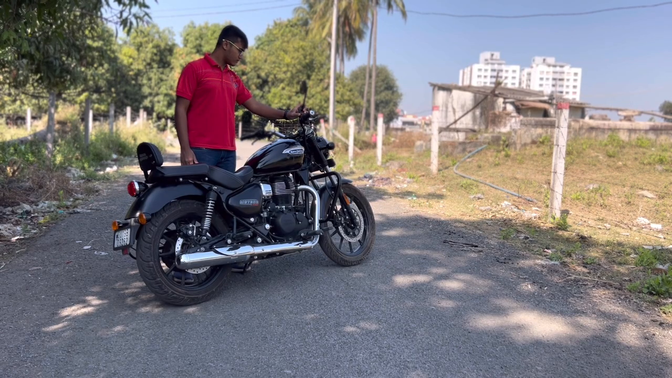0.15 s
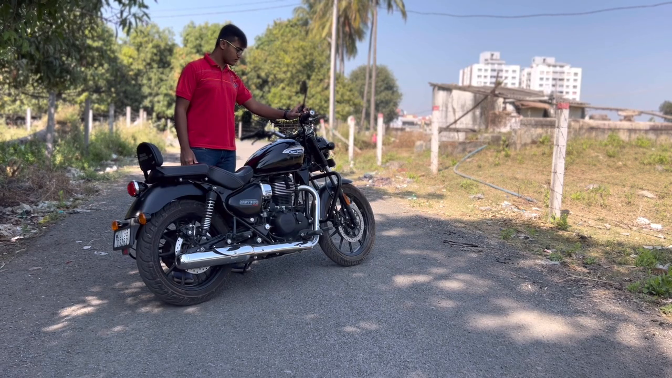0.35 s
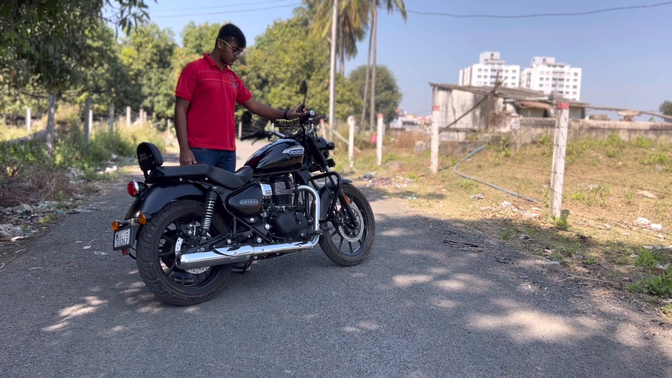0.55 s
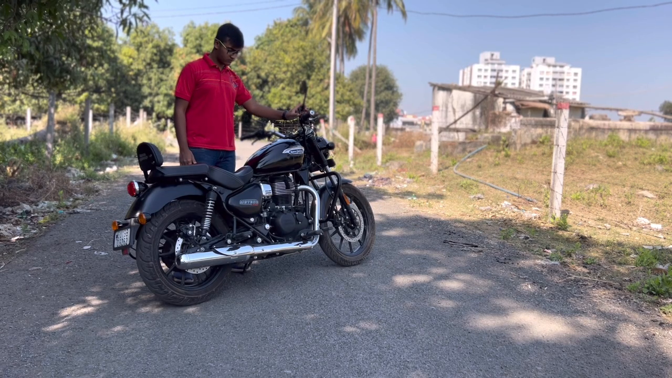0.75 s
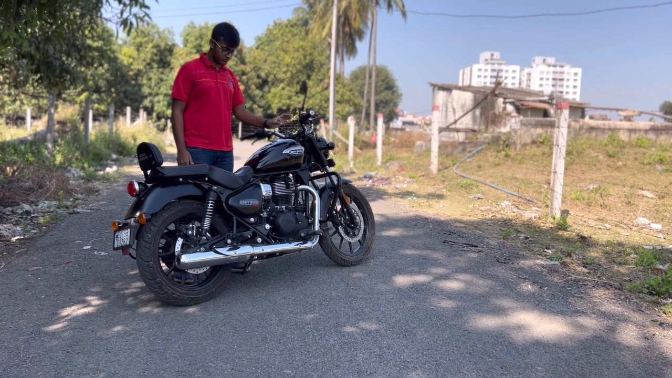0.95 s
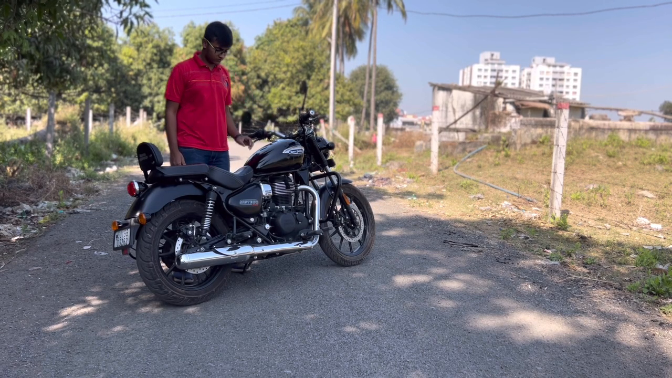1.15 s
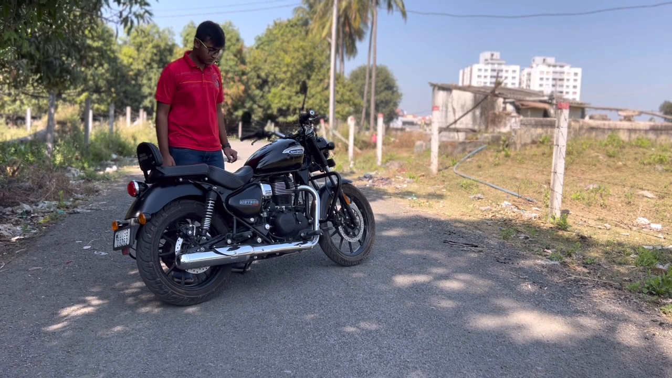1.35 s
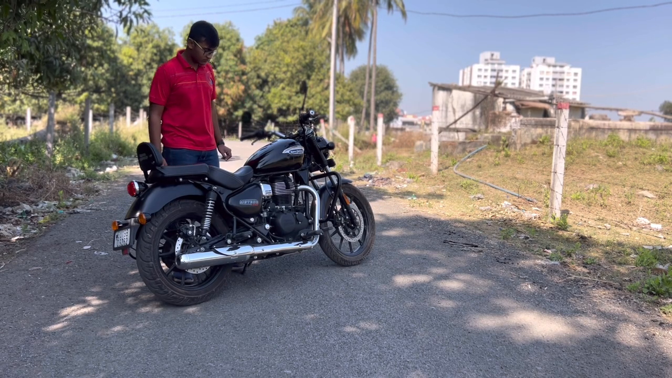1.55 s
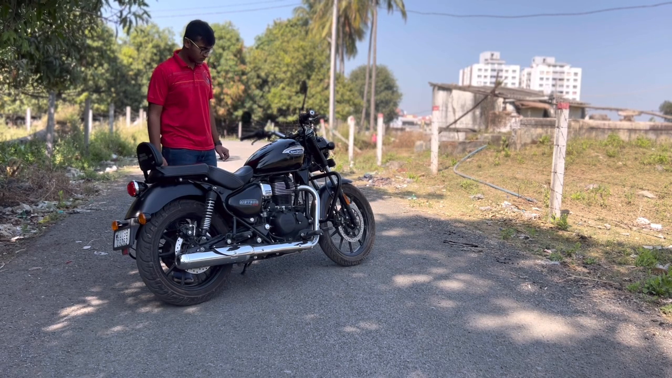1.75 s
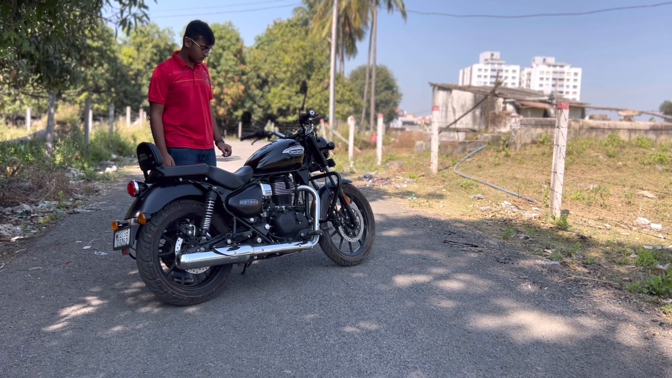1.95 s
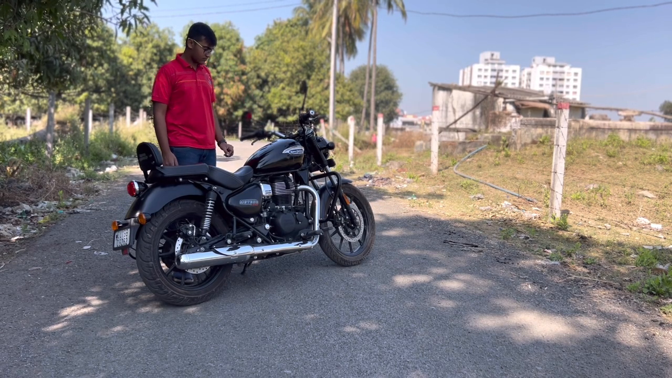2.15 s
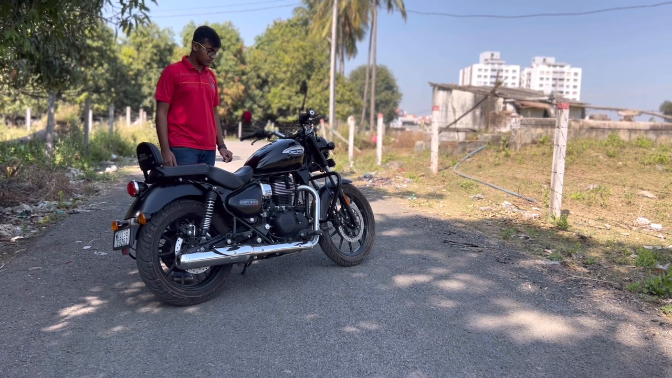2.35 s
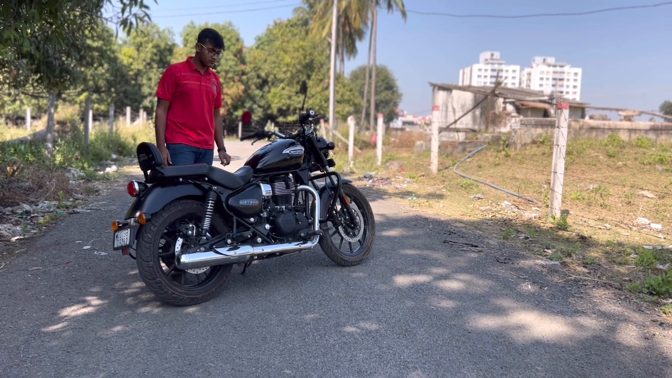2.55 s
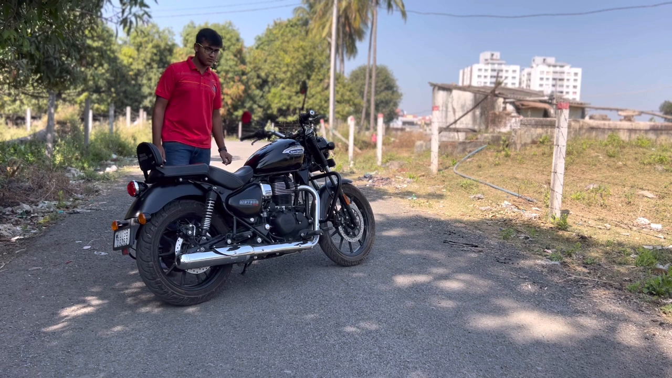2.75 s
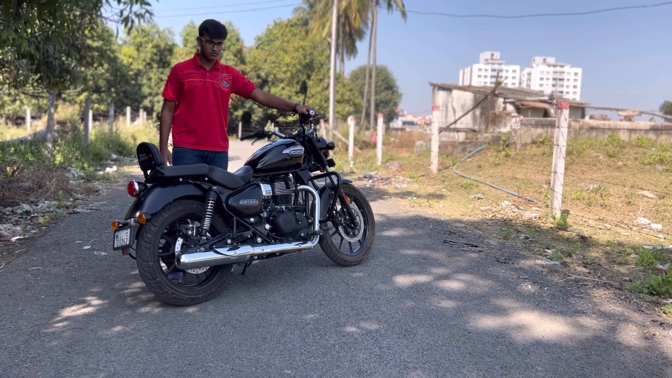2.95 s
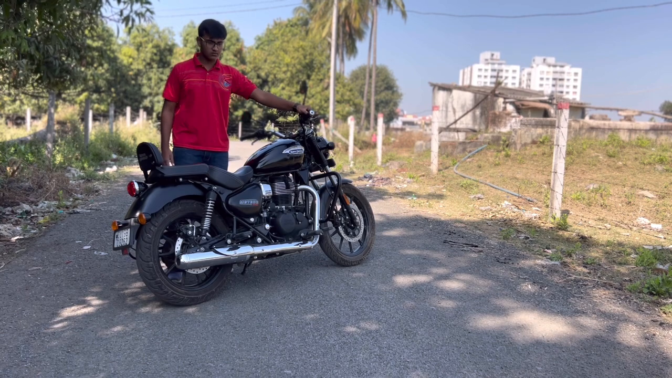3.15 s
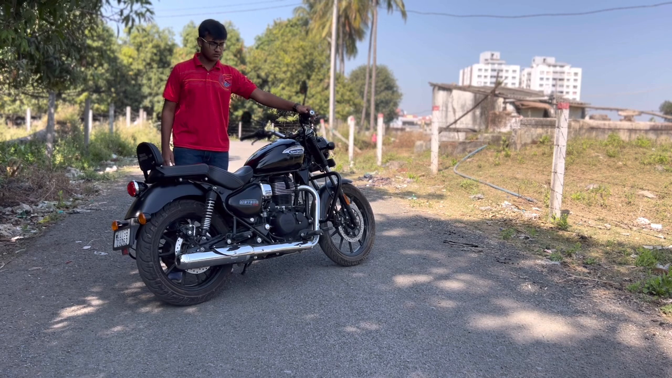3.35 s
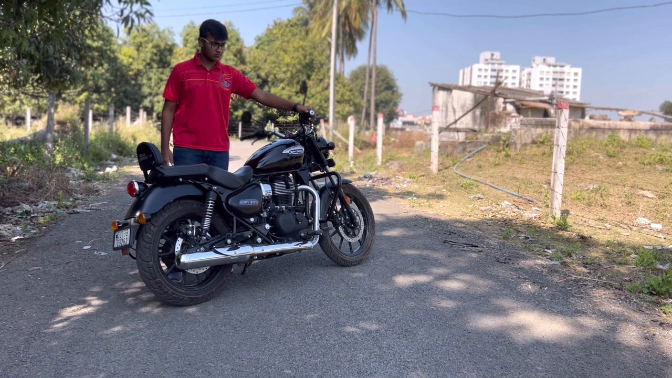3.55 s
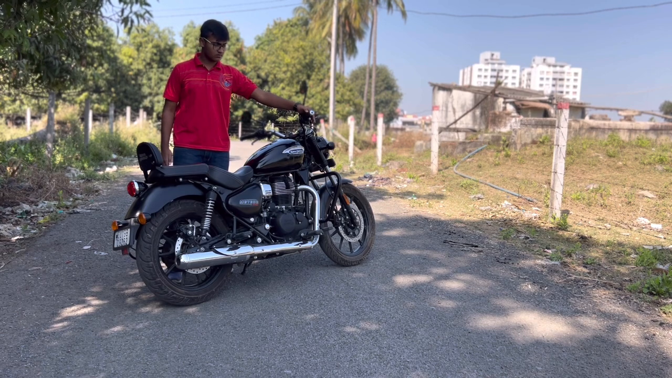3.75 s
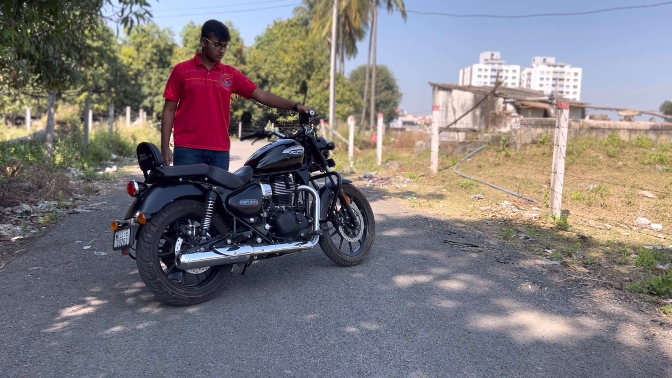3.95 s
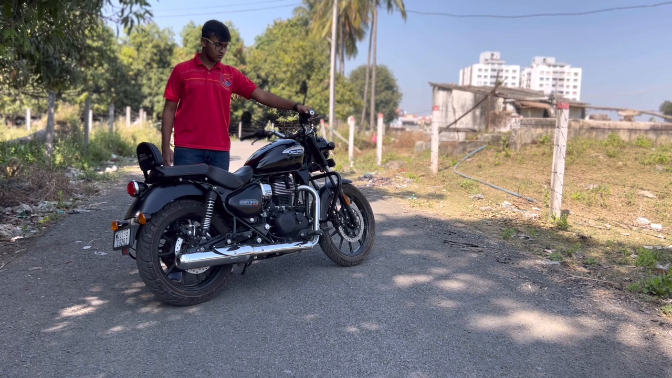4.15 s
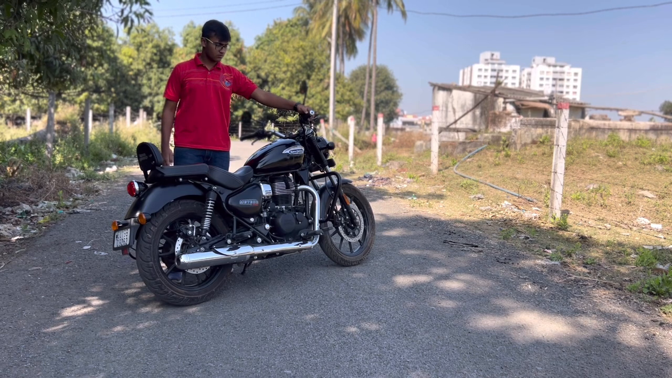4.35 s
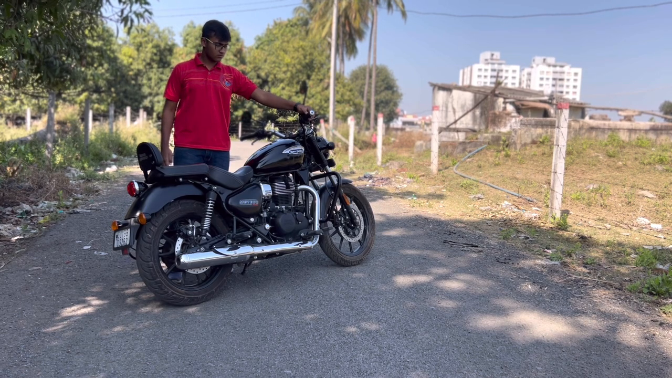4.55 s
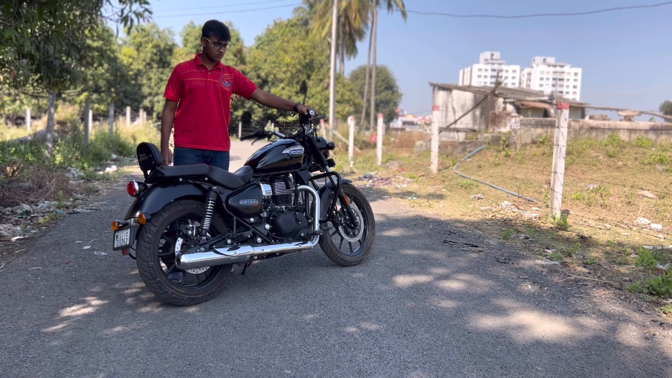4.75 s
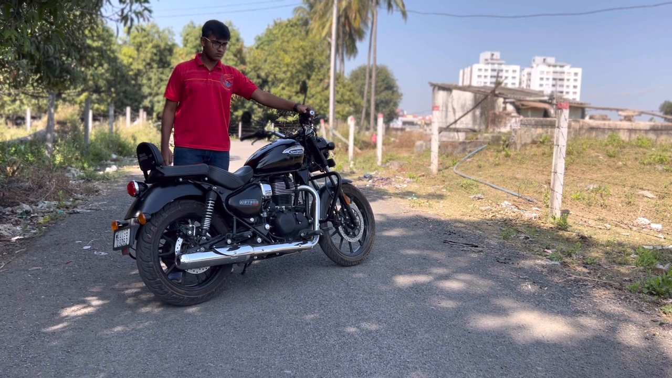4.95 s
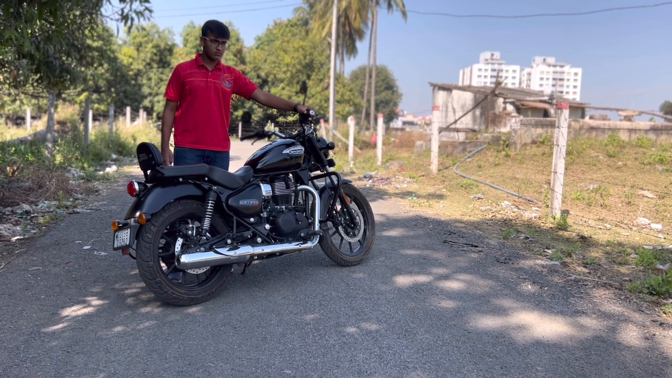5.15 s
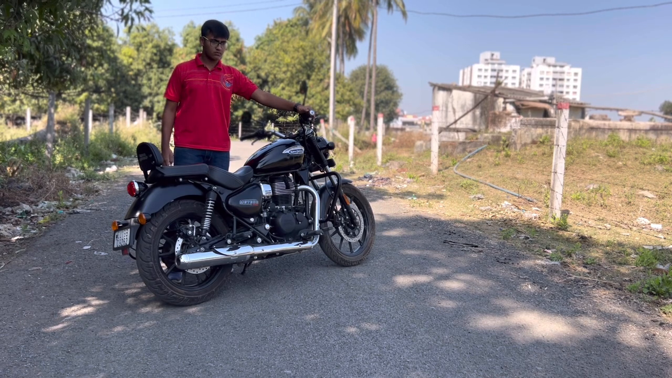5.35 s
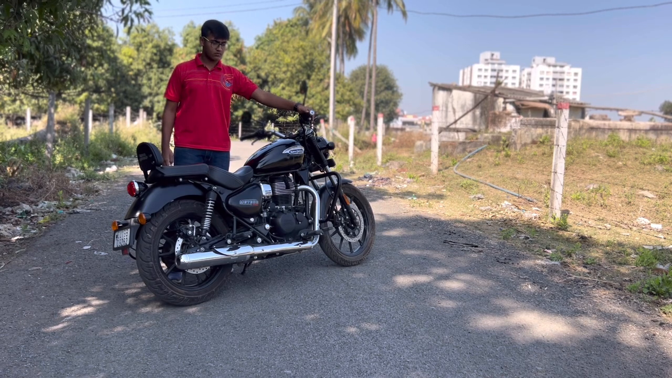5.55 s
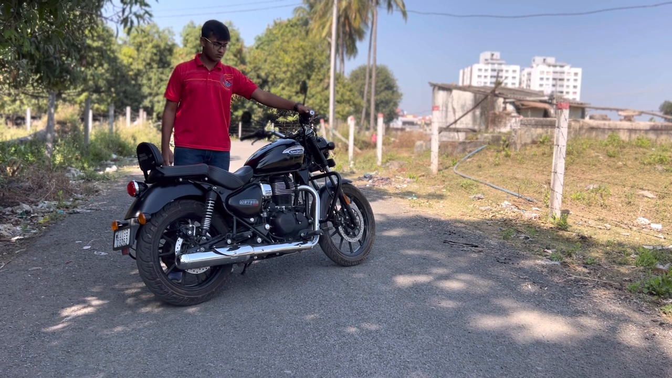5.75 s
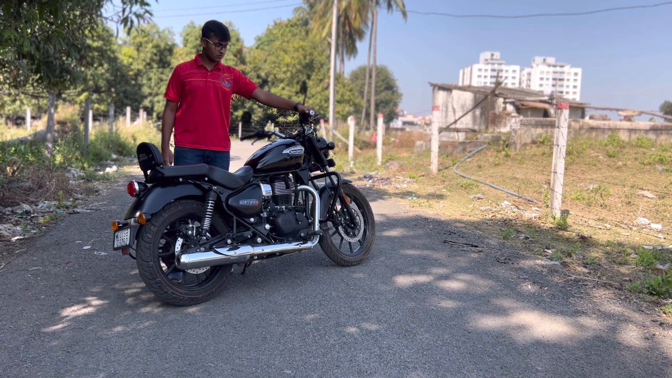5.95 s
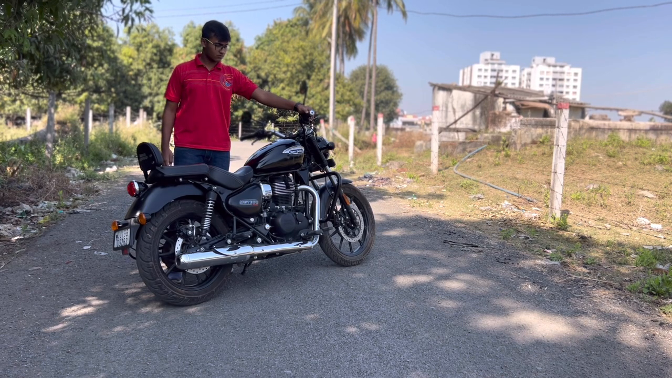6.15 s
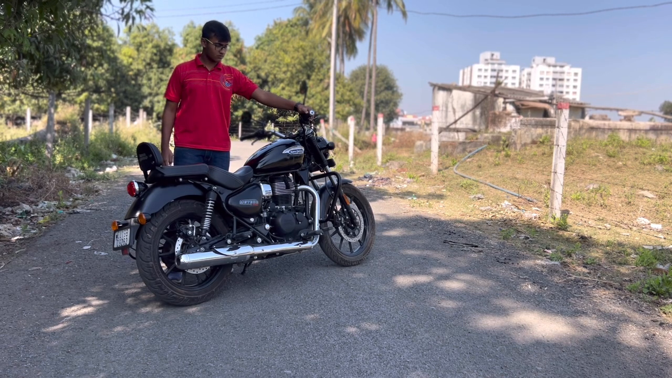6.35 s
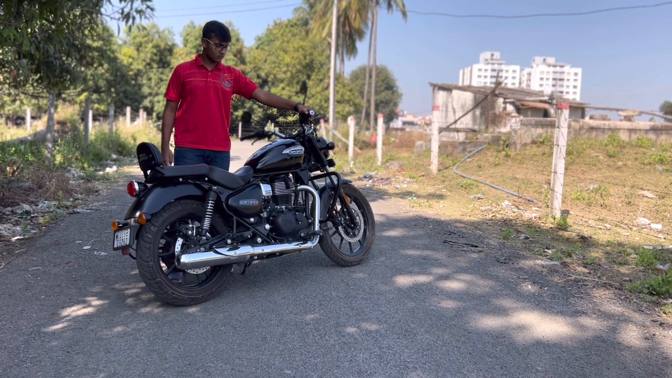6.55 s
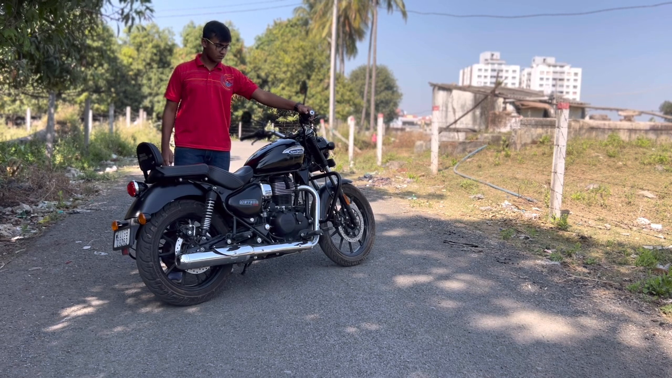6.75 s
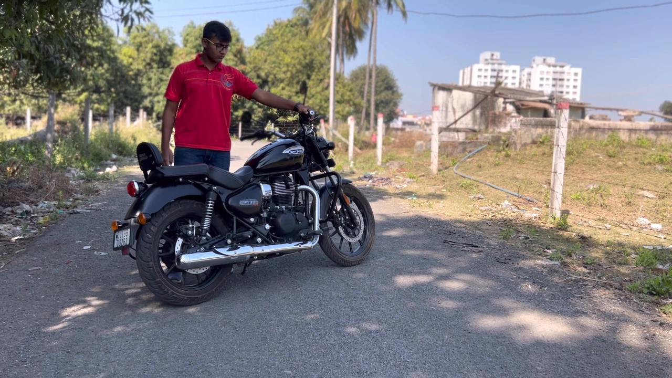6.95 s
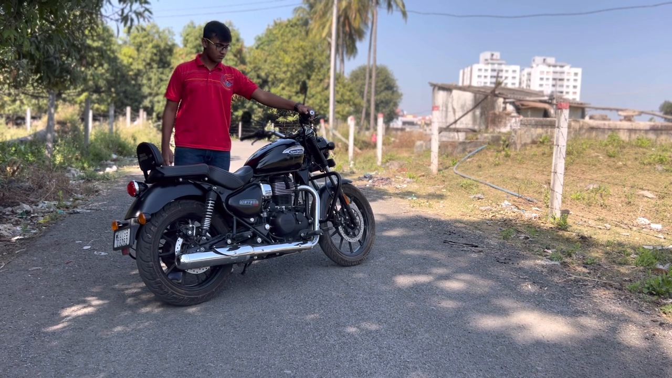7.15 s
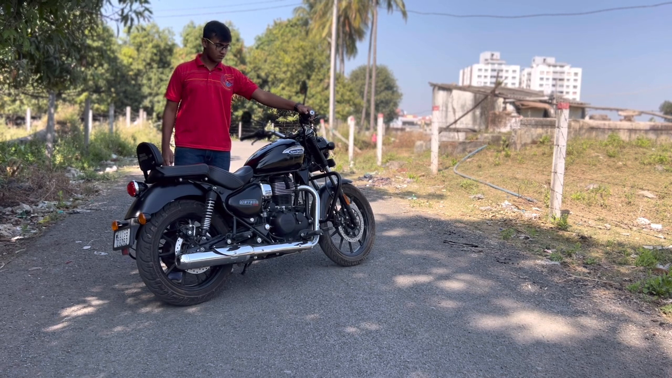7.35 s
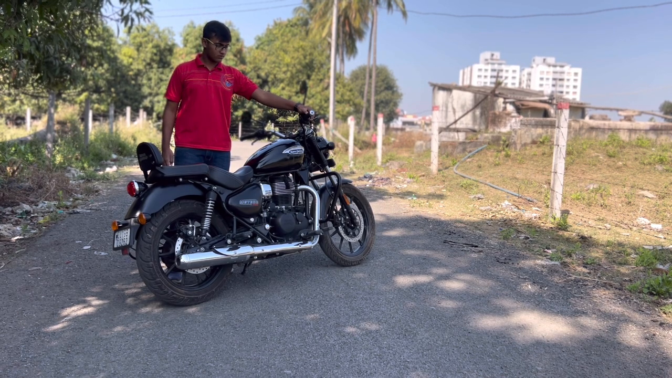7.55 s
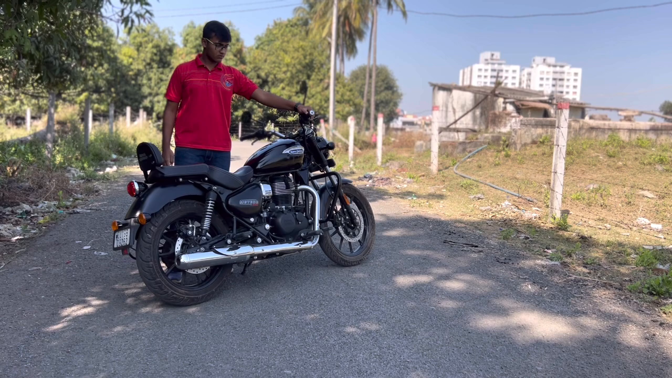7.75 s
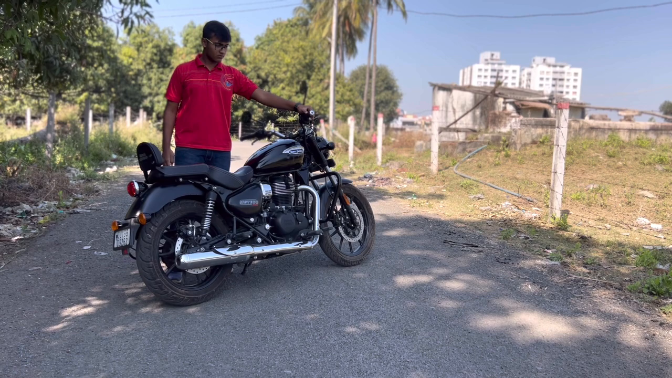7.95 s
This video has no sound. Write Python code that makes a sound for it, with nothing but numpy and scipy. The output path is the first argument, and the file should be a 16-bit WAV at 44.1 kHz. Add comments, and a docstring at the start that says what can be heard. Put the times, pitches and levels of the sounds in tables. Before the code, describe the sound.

Outdoors at a roadside, heard from a few steps away in close stereo, a parked motorcycle starts with short, sagging starter whines. The single cylinder catches and settles into separate, deep soft thumps with valve ticking and light clatter. Just before three seconds the sound dips briefly, then the throttle is blipped with a harder bark. It slows, is blipped higher, drops to idle, and revs up loud and fast to the end.

```python
"""The exhaust of a single-cylinder motorcycle booms and barks as the engine starts, idles, is blipped twice and revs up.
Engine speed times the firings; speed and effort set their strength. Each sends a gas pulse through resonant
silencer chambers and rings the pipe's modes. Shaped noise gives the gas rasp, valve tick, knocks and clatter;
decaying sines give the airbox throb and header pings.
The starter whines in gear harmonics at the first compressions, then its whirr fades away."""
import sys
import numpy as np
from scipy import signal
from scipy.fft import rfft, irfft
from scipy.io import wavfile
from scipy.ndimage import uniform_filter1d

SR = 44100
rng = np.random.default_rng(int(sys.argv[2]) if len(sys.argv) > 2 else 0)


def inscribe(sig):
    """Save sig as 16-bit PCM at rate SR to the path in sys.argv[1].

    A 1-D sig is mono; a 2-D sig holds one channel per row.
    Samples are clipped to [-1, 1] before scaling.
    """
    pcm = np.round(np.clip(np.atleast_2d(sig).T, -1, 1) * 32767)
    wavfile.write(sys.argv[1], SR, pcm.astype(np.int16))


N = 356901

# Engine speed in two stretches, each opening on a firing. Each row: time in seconds, speed in rpm.
WARM_UP_RPM = [(0.385, 994), (0.65, 1244), (1.41, 1224), (1.99, 1094), (2.22, 1011), (2.94, 1005)]
REVVING_RPM = [(3.105, 1394), (3.18, 1722), (3.39, 1933), (3.52, 1601), (3.83, 1364), (4.62, 934),
               (4.77, 1286), (4.93, 2223), (5.11, 2460), (5.22, 2003), (5.36, 2100), (5.65, 1454),
               (5.95, 1238), (6.55, 858), (7.12, 2040), (7.66, 2500), (8.06, 2837)]
# How full the cylinder's charge is. Each row: time in seconds, effort from 0 to 1.
CHARGE_EFFORT = [(.385, 0.08), (.7, 0), (1.0, 0), (1.7, 0), (2.8, 0), (3.1, 0.14), (3.18, 1), (3.26, 0.93),
                 (3.34, 0.48), (3.8, 0.46), (4.56, 0.45), (4.8, 0.98), (4.97, 1), (5.08, 0.81),
                 (5.35, 0.68), (5.6, 0.39), (6.54, 0.5), (6.67, 0.78), (7.2, 0.73), (8.06, 0.66)]
# The throttle is held open. Each row: start in seconds, end in seconds.
OPEN_THROTTLE = [(3.15, 3.28), (4.75, 5.0), (6.82, 8.1)]
# The charge burns weakly as the throttle shuts. Each row: time in seconds, weakness from 0 to 1.
WEAK_BURNS_AT = [(3.315, 0.86), (5.026, 0.96), (5.172, 0.55), (5.405, .5), (5.698, 0.47)]
# Base levels on an empty charge. Each row: speed in rpm, then boom, bark, gas rasp, valve tick, clatter in dB.
LEVELS_BY_SPEED = [(1000, -19.5, -36.5, -58.5, -53, -49), (1244, -18.5, -30.5, -59.5, -53.5, -46.5),
                   (1900, -16.5, -27, -55, -50.5, -42.5), (2570, -16, -24.5, -63.5, -47, -39)]
# What each condition adds at its full extent: boom, bark, gas rasp, valve tick, clatter in dB.
EFFORT_GAIN_DB = (5.84, 5.94, 35.24, 1.8, 5.45)
WARM_UP_GAIN_DB = (1.17, 0.67, .5, 2.33, 2.68)
WEAK_BURN_GAIN_DB = (-4.5, -8, -8, 1, -2)
# Random spread from firing to firing: boom, bark, gas rasp, valve tick in dB.
FIRING_SCATTER_DB = (1.24, 1.7, 3.4, 2)
# During the warm-up the boom thins as the idle runs fast.
IDLE_RPM, FAST_IDLE_RPM, FAST_IDLE_LOSS_DB = 1020, 1200, 2.2
# The first compression puffs out unburnt: boom, bark, gas rasp, valve tick in dB.
FIRST_PUFF_S = 0.133
UNBURNT_PUFF_DB = (-35.5, -56, -53, -60)

# Silencer resonances in series, before heat shifts them. Each row: frequency in Hz, width in Hz.
SILENCER_CHAMBERS = [(102.7, 24.7), (106.3, 84), (237, 174), (450, 330)]
# Pipe modes when hot, before load favours some. Each row: frequency in Hz, level in dB, 60 dB decay in s.
PIPE_MODES = [(183.5, -0.5, 0.065), (215, -4.5, 0.056), (259.1, 0.5, 0.06), (307, -9.5, 0.072),
              (378, -9.5, 0.064), (469.4, -21, 0.091)]
# The header's steel wall, before chance detunes it. Each row: frequency in Hz, level in dB, 60 dB decay in s.
HEADER_MODES = [(1626, -1.5, 0.03), (1884, 4.3, 0.034), (2040, 3.2, 0.042), (2290, -8, 0.025)]
# Ringing of the engine cases. Each row: frequency in Hz, width in Hz, peak in dB before its share is set.
CASE_MODES = [(759, 12, 2.5), (933, 41, 7.5), (1156, 52, 9), (1563, 35, 7.5), (2487, 17, 7.5),
              (3147, 84, 8), (3396, 35, 12.5), (4400, 5.2, 4), (4940, 28, 11.5), (5100, 99, 0)]
# Noise colours of gas jet, pressure snap, piston slap and clack, valves, moving parts and starter.
# Each row: frequency in Hz, relative level in dB per Hz.
RASP_COLOUR = [(250, 15), (600, -2.5), (1300, -4.5), (1700, -1.5), (2020, 1.5), (2600, -12), (4000, -7),
               (6000, -10), (8500, -10), (10200, -28), (12500, -5), (15500, -22)]
SNAP_COLOUR = [(300, 5), (900, 0), (2000, 8), (4000, -3.5), (8500, -6.5), (10200, -18), (12500, 0.5),
               (15500, 0.5)]
KNOCK_COLOUR = [(300, 12), (700, 1.5), (1100, -2.5), (2000, 3), (3200, -9), (4500, -31), (8000, -30),
                (15000, -18)]
TICK_COLOUR = [(500, -33), (1800, 6.5), (3500, -1), (6500, -6), (8500, 1), (10200, -17.5), (12000, 7),
               (14000, -6), (15800, -1.5)]
CLATTER_COLOUR = [(30, 1), (90, 19.5), (300, 1), (600, 0), (1100, -6), (2000, -3), (2900, -10),
                  (3800, -12.5), (5500, -12), (8000, -20.5), (10200, -39.5), (13000, -18), (15500, -42)]
WHIRR_COLOUR = [(400, -6), (900, -13.5), (1600, -0.5), (2300, -4), (2800, -9), (3500, -2), (4500, -11.5),
                (7000, -16.5), (10000, -30), (12500, -16.5), (15500, -24)]

# The starter bites against the engine. Each row: start in seconds, hold in seconds, mesh frequency in Hz,
# sag in Hz per second, level in dB, extra weight of the mesh fundamental in dB.
STARTER_BITES = [(0.0, 0.029, 890, 2480, -35.5, 8.5), (0.03, 0.032, 744, 2294, -45.5, 13.5),
                 (0.223, 0.034, 877, 1000, -33, -3), (0.32, 0.021, 859, 2190, -27.5, -7)]
BITE_ATTACK_S, BITE_RELEASE_DB_PER_S = 0.013, 595
# Gear harmonics. Each row: multiple of the mesh frequency, level in dB.
GEAR_HARMONICS = [(1, -10), (2, 2), (3, -11), (4, -4), (5, -17), (6, -17), (8, -9)]
# The freed starter's whirr falls by the drop at the given time, ever faster.
COAST_DB, COAST_S, COAST_DROP_DB, COAST_BEND = -40, 1.6, -15, 3.7

# Coherence of the two microphone ports. Each row: frequency in Hz, likeness from 0 to 1.
PORT_LIKENESS = [(100, .99), (300, .95), (600, .8), (1200, .85), (2200, .8), (4000, .55), (8000, .7),
                 (13000, .8)]
# Phase lag of the right port. Each row: frequency in Hz, lag in radians.
PORT_LAG = [(0, 0), (2410, 0.77), (3700, 3), (4740, 1.43), (5600, 6.5), (6030, 1), (6980, 1.87), (8100, -3),
            (8530, 12), (9040, -5.5), (10900, -23), (12500, -2), (14400, -23), (15400, -5)]
# Level of the left port over the right. Each row: frequency in Hz, difference in dB.
PORT_LEAN = [(60, -2), (110, 2), (200, -1), (380, -0.5), (700, 2.5), (1290, -0.5), (2380, -1), (4400, 3),
             (8120, 1.5), (15000, -1)]
# The level dips briefly. Each row: time in seconds, gain in dB.
LEVEL_DIP = [(2.87, 0.5), (2.945, -7), (2.97, -15), (3.01, -37), (3.065, -22), (3.085, -4), (3.16, -1)]
EDGE_HZ = 15800


def exhaust(boom_db=0, bark_db=-0.5, load_bark_db=1.0, warming=0.0038, lag_s=.00009):
    """Source and filter: each gas pulse excites the silencer's boom and the pipe's bark."""
    t = np.arange(8192) / SR
    s = 1j * np.fft.rfftfreq(len(t), 1 / SR)
    out = np.zeros(N)
    for (start, boom, bark, _, _), period in cycles():
        load = any(opened < start < shut for opened, shut in OPEN_THROTTLE)
        heat = 1 + warming * (2 * load - 1)
        wave = irfft(rfft(gas_flow(t, period, load)) * silencer(s, heat))
        ring = pipe_ring(t, period, load)
        # energy is referred to 40 ms of boom and 27 ms of bark
        wave = wave / np.sqrt(np.sum(wave ** 2) / (.04 * SR))
        ring = ring / np.sqrt(np.sum(ring ** 2) / (.027 * SR))
        add(out, start, amp(boom + boom_db) * wave)
        add(out, start, amp(bark + bark_db + load_bark_db * load) * ring)
    # the right port is slightly nearer the outlet
    late = np.interp(np.arange(N) - lag_s * SR, np.arange(N), out)
    return np.array([late * amp(-.53), out * amp(.53)])


def gas_flow(t, period, load, push_at=0.0678, push_width=0.03377, spill=0.081, blowdown=1.41,
             suction=0.87, return_at=0.1883, rebound=0.47, idle_cycle_s=0.11, shortest_cycle_s=.085,
             briskness=1.22, overlap=0.19, overlap_at=0.3273):
    """Gas discharge: the piston pushes at idle; under load gas bursts out, leaves suction and rebounds."""
    push = hump(t / period, push_at, push_width)
    drain = np.exp(-t / 0.054)
    if load:
        return blowdown * drain - suction * push + rebound * hump(t / period, return_at, 0.032)
    # with the throttle shut the puff shortens as speed rises, down to a limit set by the thin charge
    puff_s = idle_cycle_s * (max(period, shortest_cycle_s) / idle_cycle_s) ** briskness
    # a gulp at valve overlap prolongs the boom at some speeds and cuts it short at others
    gulp = hump(t / period, overlap_at, push_width * puff_s / period)
    return hump(t / puff_s, push_at, push_width) + spill * drain - overlap * gulp


def silencer(s, heat, radiation_hz=600):
    """Resonators in series: the open end radiates little bass, and hot gas lifts every resonance."""
    response = (s / radiation_hz) ** 3
    for hz, width in SILENCER_CHAMBERS:
        hot_hz = hz * heat
        response = response / (1 + s * width / hot_hz ** 2 + (s / hot_hz) ** 2)
    return response


def pipe_ring(t, period, load, cool_pipe=0.864, idle_damping=0.84, opening_s=0.0031,
              idle_opening=0.023, drift=0.026, focus_hz=258, focus_db=13):
    """Modal ringing: valve lift excites the pipe; cooler gas lowers its modes, and at idle it sucks in first."""
    # the faster the engine, the hotter the gas
    warmth = np.clip((.105 - period) / 0.058, 0, 1)
    unsteady = drift / 4 if load else drift
    heat = (cool_pipe + (1 - cool_pipe) * warmth) * (1 + unsteady * rng.standard_normal(len(PIPE_MODES)))
    damping, lift_s, sign = (1, opening_s, 1) if load else (idle_damping, idle_opening * period, -1)
    ring = 0
    for (hz, db, t60), mode_heat in zip(PIPE_MODES, heat):
        # a hard blowdown favours the modes near focus_hz; the others lose focus_db per octave
        loss_db = load * focus_db * abs(np.log2(hz / focus_hz))
        decay = amp(db - loss_db - 60 * damping * t / t60)
        ring = ring + decay * np.sin(2 * np.pi * hz * mode_heat * t)
    return sign * ring * (1 - np.exp(-t / lift_s)) ** 2


def cycles(longest_s=0.114):
    """Four-stroke cycle: yields (s, boom, bark, rasp, tick in dB) and cycle length in seconds."""
    starts = firing_times()
    chance = rng.standard_normal((len(starts), len(FIRING_SCATTER_DB)))
    sizes = levels(starts)[:-1].T + np.array(FIRING_SCATTER_DB) * chance
    rows = np.vstack([(FIRST_PUFF_S, *UNBURNT_PUFF_DB), np.column_stack([starts, sizes])])
    gaps = np.diff(rows[:, 0])
    return zip(rows, np.minimum(np.append(gaps, gaps[-1]), longest_s))


def firing_times():
    """Crank kinematics: a four-stroke single fires once in two turns of the crank."""
    times = []
    for stretch in (WARM_UP_RPM, REVVING_RPM):
        s = np.arange(stretch[0][0], stretch[-1][0] + .02, 1 / SR)
        count = np.cumsum(speed(s)) / (120 * SR)
        times.extend(np.interp(np.arange(count[-1]), count, s))
    return np.array(times)


def speed(s):
    """Piecewise-linear rotation: engine speed in rpm at the times s."""
    return np.interp(s, *np.transpose(WARM_UP_RPM + REVVING_RPM))


def levels(s):
    """Source strength: boom, bark, rasp, tick and clatter in dB follow speed and effort at the times s."""
    rpm, *columns = np.transpose(LEVELS_BY_SPEED)
    base = np.array([np.interp(speed(s), rpm, column) for column in columns])
    warming_up = s < REVVING_RPM[0][0]
    fastness = np.clip((speed(s) - IDLE_RPM) / (FAST_IDLE_RPM - IDLE_RPM), 0, 1)
    base[0] -= FAST_IDLE_LOSS_DB * warming_up * fastness
    effort = np.interp(s, *np.transpose(CHARGE_EFFORT))
    weak = sum(weakness * hump(s, at, .02) for at, weakness in WEAK_BURNS_AT)
    gains = np.outer(EFFORT_GAIN_DB, effort) + np.outer(WARM_UP_GAIN_DB, warming_up)
    return base + gains + np.outer(WEAK_BURN_GAIN_DB, weak)


def intake(idle_db=-50, effort_db=25, airbox_hz=50, t60=0.2, rise_s=0.014, at=0.15):
    """Cavity resonance: the airbox throbs once a cycle, the more the fuller the charge."""
    t = np.arange(8000) / SR
    throb = (1 - np.exp(-t / rise_s)) * amp(-60 * t / t60) * np.sin(2 * np.pi * airbox_hz * t)
    out = np.zeros(N)
    for (start, *_), period in cycles():
        effort = np.interp(start, *np.transpose(CHARGE_EFFORT), left=0)
        add(out, start + at * period, amp(idle_db + effort_db * effort) * throb / throb.max())
    return out


def rasp(rasp_db=2, decay_s=0.021, lead_db=-15, grit_db=1.0):
    """Jet turbulence: gas rasps from the outlet at each firing, after a rattle of combustion just ahead."""
    t = np.arange(-1500, 4000) / SR
    swell = np.zeros(N)
    for (start, _, _, level, _), period in cycles():
        jet = np.clip(t / 0.00074, 0, 1) * np.exp(-np.maximum(t, 0) / decay_s)
        rattle = hump(t / period, -.12, .1)
        add(swell, start + t[0], amp(level + rasp_db) * (jet + amp(lead_db) * rattle))
    return swell * noise(RASP_COLOUR, 0.91) * amp(grit_db * wander(30))


def snaps(snap_db=-25.5, reference_effort=0.85, per_effort_db=45, decay_s=0.0027):
    """Wave steepening: on a full charge the pressure front sharpens and snaps at the outlet."""
    t = np.arange(1000) / SR
    swell = np.zeros(N)
    for start in firing_times():
        effort = np.interp(start, *np.transpose(CHARGE_EFFORT))
        level = snap_db + per_effort_db * (effort - reference_effort)
        add(swell, start, amp(level) * np.exp(-t / decay_s))
    return swell * noise(SNAP_COLOUR, 0.81)


def cracks(crack_db=-28.5, fall_db=50, scatter_db=1.5):
    """Impulsive wall excitation: a hard firing pings the header pipe; a thin charge hardly does."""
    t = np.arange(2500) / SR
    out = np.zeros((2, N))
    for start in firing_times():
        shortfall = max(1 - np.interp(start, *np.transpose(CHARGE_EFFORT)), 0)
        level = crack_db - fall_db * shortfall ** 2 + scatter_db * rng.standard_normal()
        for hz, db, t60 in HEADER_MODES:
            detune, phase = rng.standard_normal(2)
            swell = amp(level + db - 60 * t / t60) * (1 - np.exp(-t / 0.00084))
            angle = 2 * np.pi * hz * (1 + 0.024 * detune) * t + np.pi * phase
            for port, lead in zip(out, (.6, -.6)):
                add(port, start, swell * np.sin(angle + lead))
    return out


def valves(tick_db=5.0, first_at=0.24, second_at=0.59, second_db=-13, width_s=0.0038, tail_db=-11):
    """Impact noise: the valves seat at two fixed angles of the cycle."""
    t = np.arange(6000) / SR
    swell = np.zeros(N)
    for (start, _, _, _, level), period in cycles():
        first = hump(t, first_at * period, width_s) + amp(tail_db) * hump(t / period, 0.33, 0.091)
        second = amp(second_db + 1.0 * rng.standard_normal()) * hump(t, second_at * period, width_s)
        add(swell, start, amp(level + tick_db) * (first + second))
    return swell * noise(TICK_COLOUR, 0.3) * amp(0.88 * wander(20) + 2)


def knocks(knock_db=-1, ahead=.2, scatter=0.045, decay_s=0.0039, count=3):
    """Impact noise: the piston slaps a few times as the charge burns, just before the exhaust opens."""
    t = np.arange(2500) / SR
    swell = np.zeros(N)
    for (start, *_), period in cycles():
        # ahead and scatter are fractions of a cycle
        for early, size in rng.standard_normal((count, 2)):
            add(swell, start - (ahead + scatter * early) * period, amp(1.5 * size) * np.exp(-t / decay_s))
    return amp(running_db() + knock_db) * swell * noise(KNOCK_COLOUR, 1.3)


def clatter(level_db=2.0, grit_db=2):
    """Modulated noise: chain, gears and piston swell at each combustion and again as the valves overlap."""
    starts = firing_times()
    turn = np.interp(np.arange(N) / SR, starts, np.arange(len(starts))) % 1
    throb = 1 + .7 * hump(turn, .83, .08) + .7 * hump(turn, .17, .14)
    level = amp(running_db() + level_db + grit_db * wander(70))
    return level * throb * noise(CLATTER_COLOUR, 1)


def running_db():
    """Slow envelope: level of the mechanical clatter in dB at every sample."""
    s = np.arange(0, N, 128) / SR
    return np.interp(np.arange(N) / SR, s, levels(s)[-1])


def starter(whine_db=0, scrape_db=-3):
    """Gear meshing: tooth contacts give a rough harmonic whine that sags at each compression."""
    out = np.zeros((2, N))
    t = np.arange(8000) / SR
    waver = 1 + .022 * wander(25) + .06 * wander(5)
    flutter = amp(3.5 * wander(30) - 1)
    scrape = amp(scrape_db) * noise(WHIRR_COLOUR, 1)
    for start, hold, hz, sag, level, weight in STARTER_BITES:
        span = max(round(start * SR), 0) + np.arange(len(t))
        angle = 2 * np.pi * np.cumsum((hz - sag * t) * waver[span]) / SR
        gears = 0
        for k, db in GEAR_HARMONICS:
            # the left port hears it first
            phase = rng.uniform(0, 2 * np.pi) + np.array([[.5], [0]]) * k
            gears = gears + amp(db + weight * (k == 1)) * np.sin(k * angle + phase)
        release_db = BITE_RELEASE_DB_PER_S * np.maximum(t - hold, 0)
        swell = np.minimum(t / BITE_ATTACK_S, 1) * amp(level - release_db)
        out[:, span] += swell * (amp(whine_db) * flutter[span] * gears + scrape[:, span])
    return out


def coasting(flutter_db=1.0):
    """Rotor noise: the freed starter's whirr fades ever faster, its colour unchanged."""
    t = np.arange(N) / SR
    fade_db = np.maximum(COAST_DROP_DB * (t / COAST_S) ** COAST_BEND, -100)
    return amp(COAST_DB + fade_db + flutter_db * wander(60)) * noise(WHIRR_COLOUR, 0.76)


def clack(at_s=0.554, level_db=-29, decay_s=0.0088):
    """Impact noise: one small metal clack as the starter runs free."""
    since = np.arange(N) / SR - at_s
    return amp(level_db) * (since > 0) * np.exp(-abs(since) / decay_s) * noise(KNOCK_COLOUR, 1)


def noise(colour, ring):
    """Partial coherence: coloured noise at two microphone ports, with a share of the cases' ringing."""
    hz = np.fft.rfftfreq(N, 1 / SR)
    left, other = rfft(rng.standard_normal((2, N)))
    same = np.clip(read(PORT_LIKENESS, hz), 0, 1)
    right = (same * left + np.sqrt(1 - same ** 2) * other) * np.exp(-1j * read(PORT_LAG, hz))
    ringing_db = sum(db / (1 + (2 * (hz - f) / width) ** 2) for f, width, db in CASE_MODES)
    lean = amp(read(PORT_LEAN, hz) / 2)
    spectrum = amp(read(colour, hz) + ring * ringing_db)
    return evened(irfft(np.array([left * lean, right / lean]) * spectrum, N))


def wander(size):
    """Random modulation: noise smoothed twice over size samples, at unit RMS."""
    return evened(uniform_filter1d(uniform_filter1d(rng.standard_normal(N), size), size))


def hump(turn, centre, width):
    """Gaussian pulse: a smooth swell at one angle of the engine cycle or one time."""
    return np.exp(-.5 * ((turn - centre) / width) ** 2)


def amp(db):
    """Decibel law: level to amplitude ratio."""
    return 10 ** (np.asarray(db) / 20)


def evened(x):
    """RMS normalisation to unity."""
    return x / np.sqrt(np.mean(x ** 2) + 1e-20)


def read(points, hz):
    """Spectral interpolation: straight lines on a log-frequency axis."""
    f, value = np.transpose(points)
    return np.interp(np.log(hz + 1), np.log(f + 1), value)


def curve(rows):
    """Linear interpolation of a time table at every sample."""
    return np.interp(np.arange(N) / SR, *np.transpose(rows))


def add(mix, s, sound):
    """Superposition: adds a sound from time s in seconds, cut at the end of the mix."""
    part = mix[max(round(s * SR), 0):][:len(sound)]
    part += sound[:len(part)]


def scene(cranking_db=-11):
    """Superposition of all sources of the machine, heard from a few steps away."""
    # the clatter builds up only as the engine catches
    caught = amp(np.interp(np.arange(N) / SR, [.3, .45], [cranking_db, 0]))
    gas = exhaust() + intake() + rasp() + snaps() + cracks()
    mechanism = valves() + caught * (clatter() + knocks())
    return gas + mechanism + starter() + coasting() + clack()


def record(dry, low_cut_hz=28):
    """Linear filtering and gain: the microphone's bass cut, a brief dip in level, then the band limit."""
    bass_cut = signal.butter(2, low_cut_hz, "highpass", fs=SR, output="sos")
    lean = signal.sosfilt(bass_cut, dry)
    edge = signal.firwin(511, EDGE_HZ, window=("kaiser", 9), fs=SR)
    return signal.oaconvolve(lean * amp(curve(LEVEL_DIP)), edge[None], "same", axes=1)


dry = scene()
out = record(dry)
inscribe(out)
```